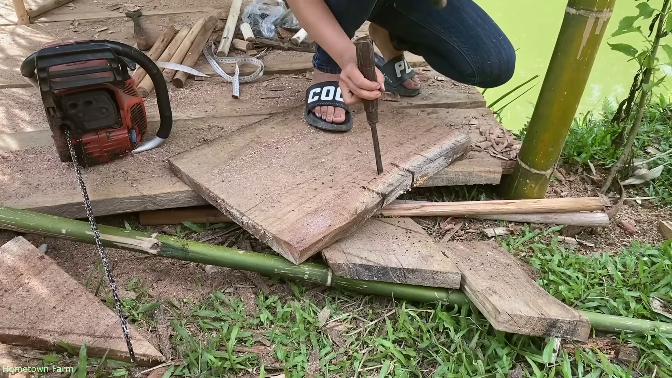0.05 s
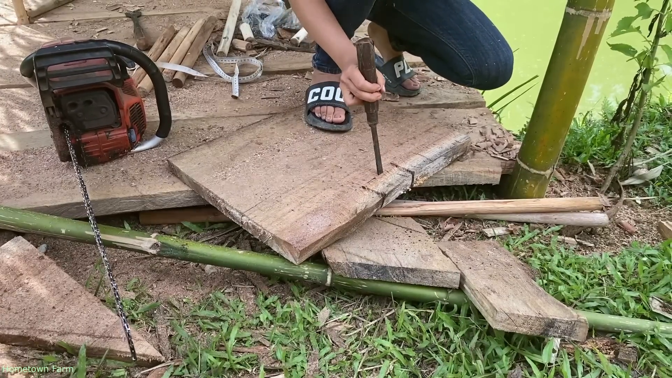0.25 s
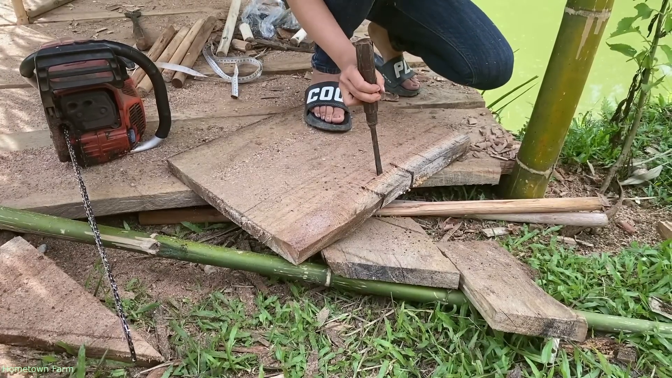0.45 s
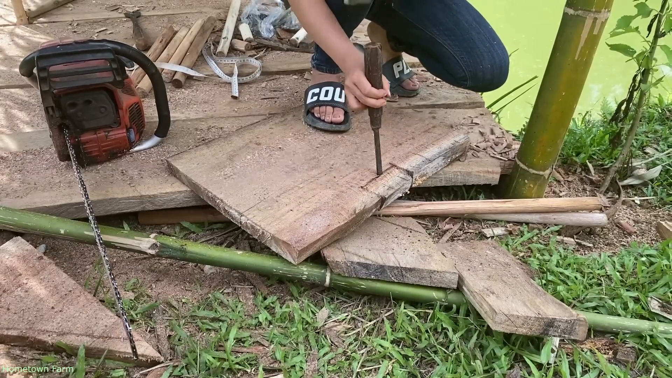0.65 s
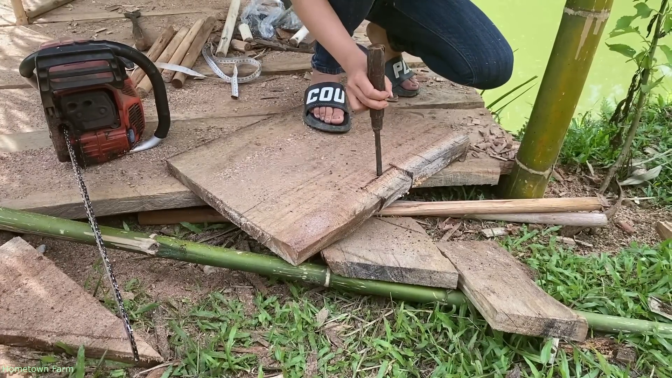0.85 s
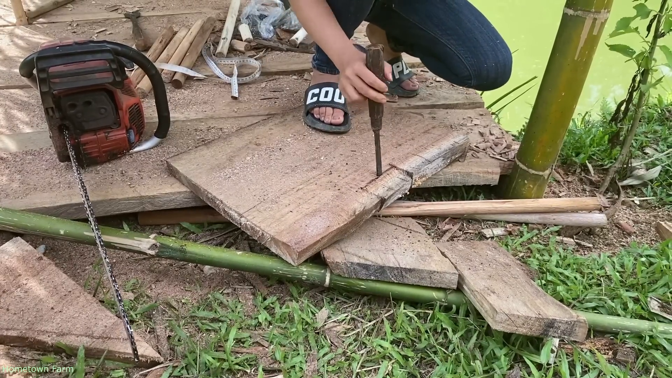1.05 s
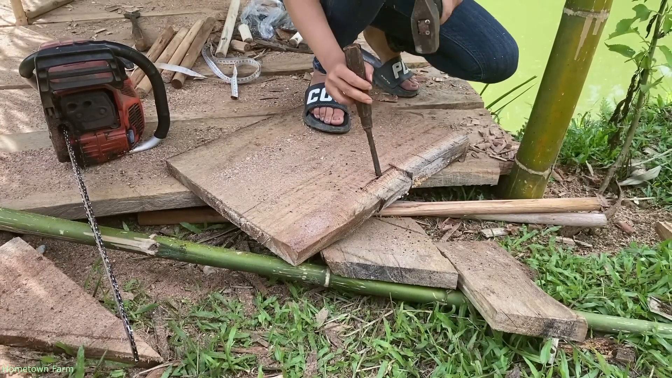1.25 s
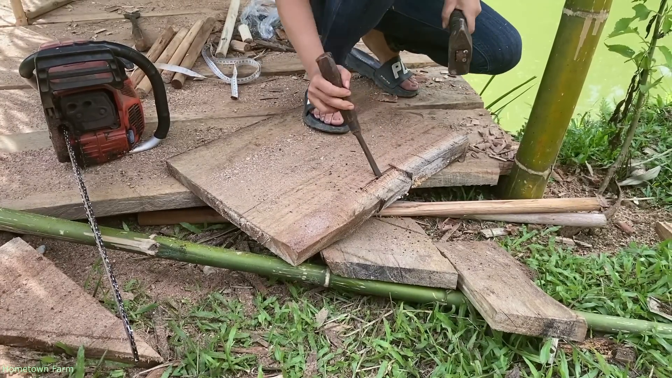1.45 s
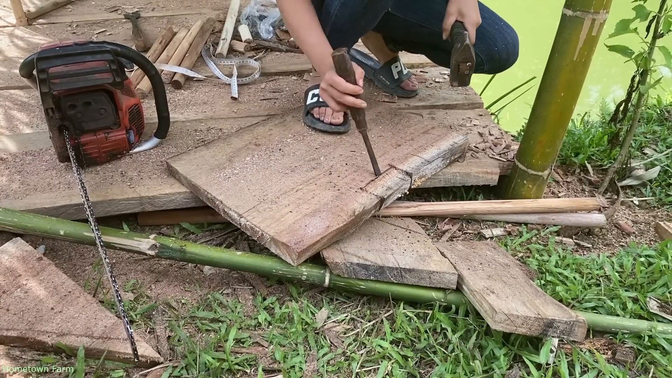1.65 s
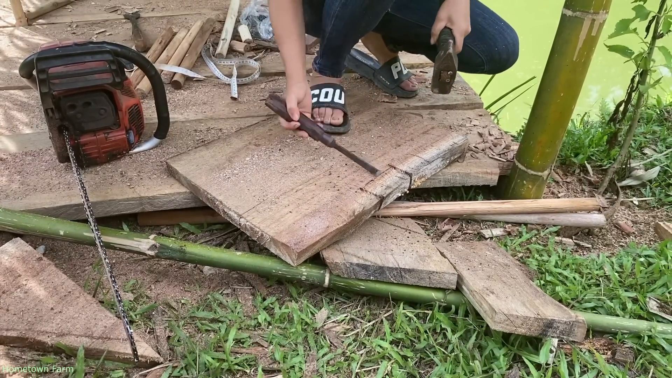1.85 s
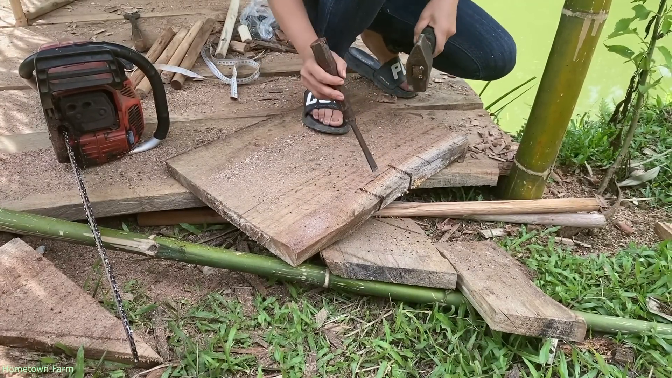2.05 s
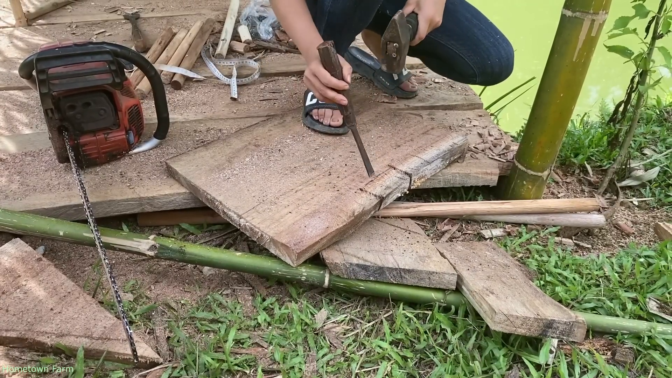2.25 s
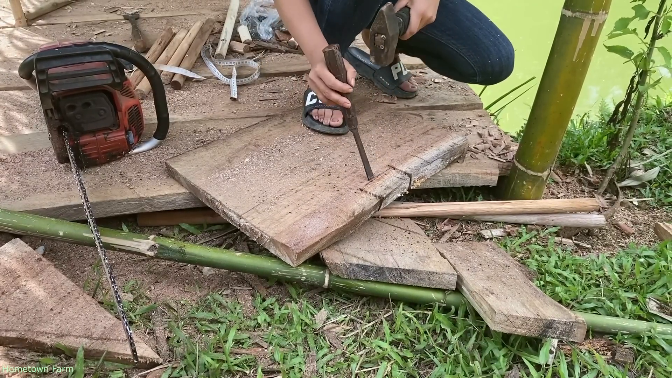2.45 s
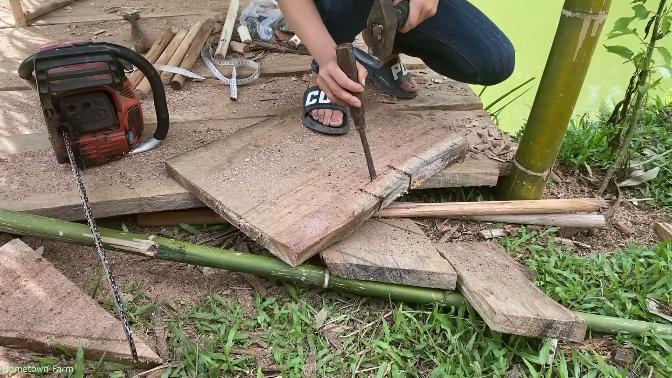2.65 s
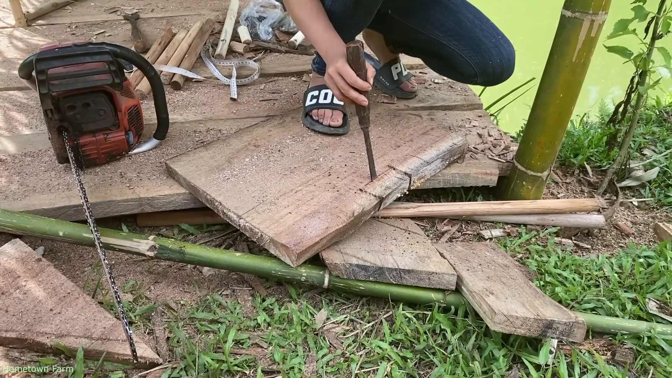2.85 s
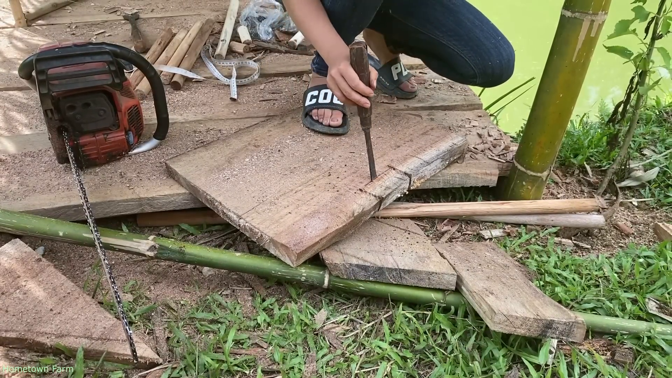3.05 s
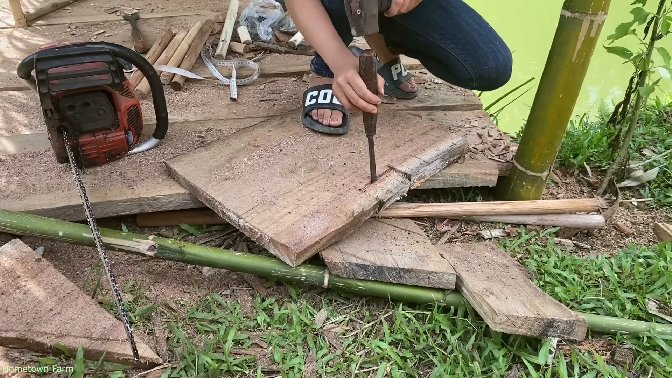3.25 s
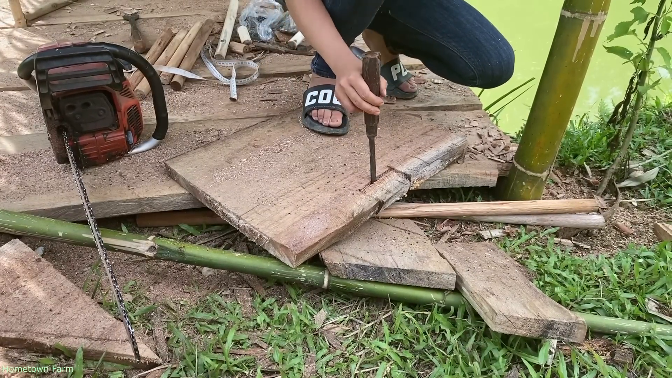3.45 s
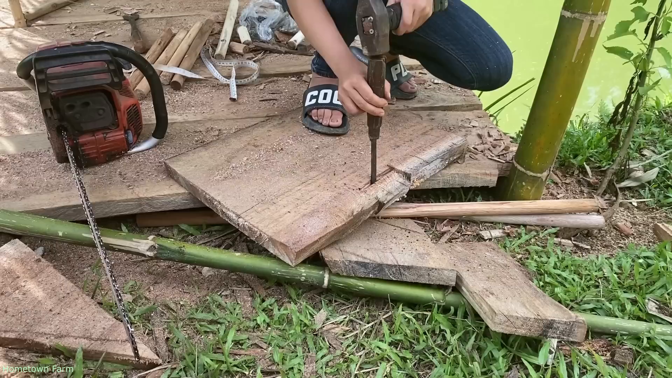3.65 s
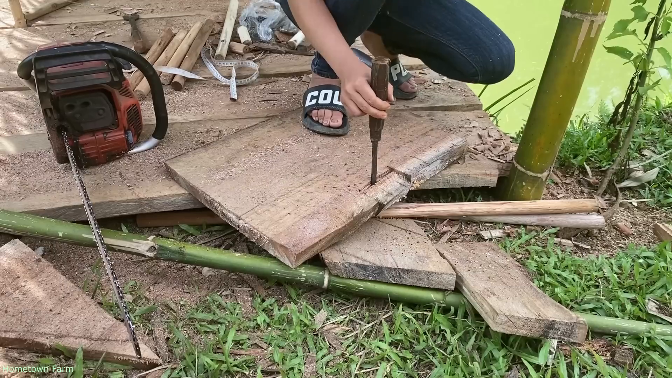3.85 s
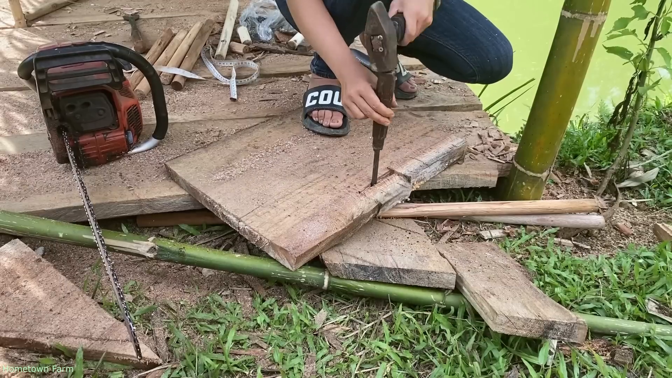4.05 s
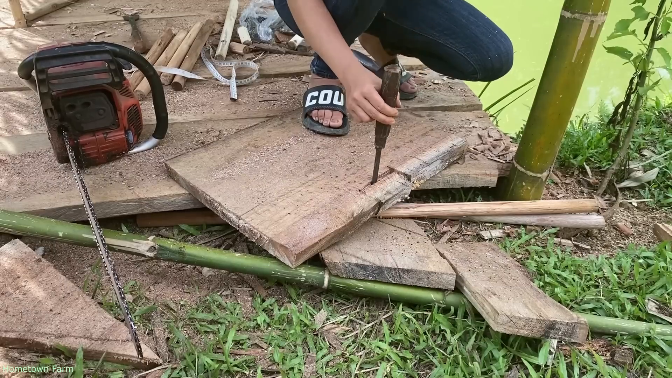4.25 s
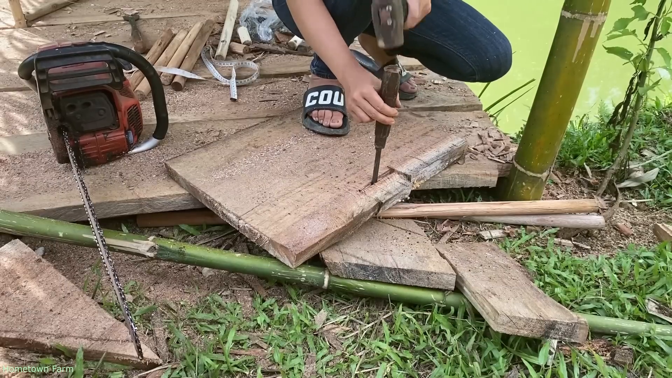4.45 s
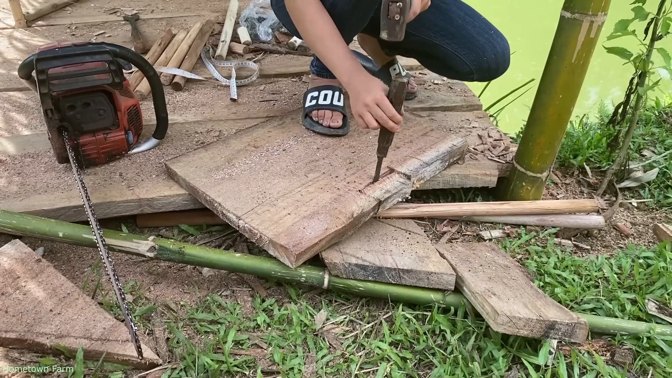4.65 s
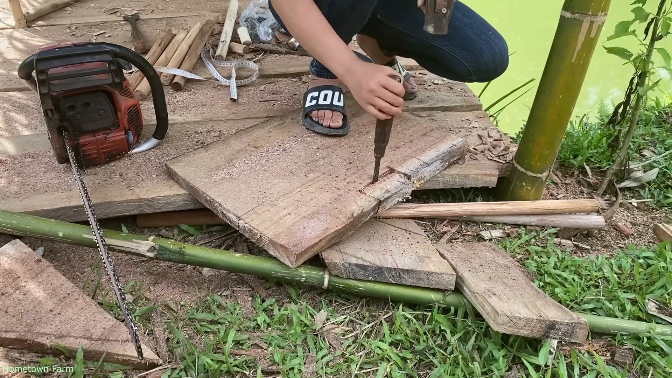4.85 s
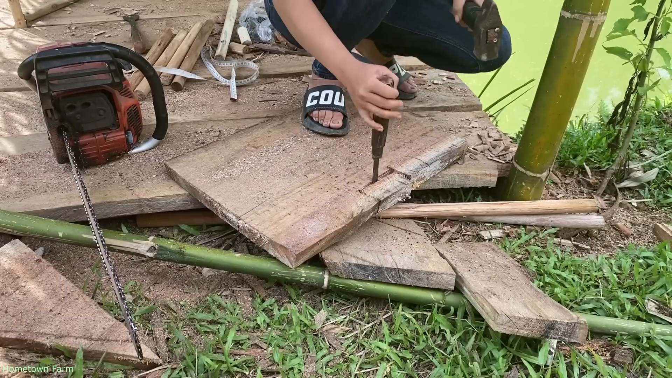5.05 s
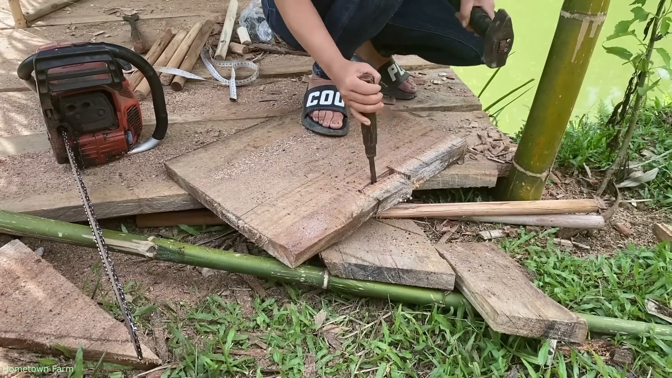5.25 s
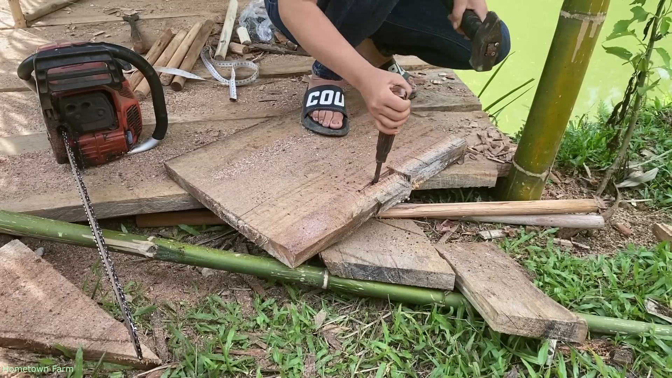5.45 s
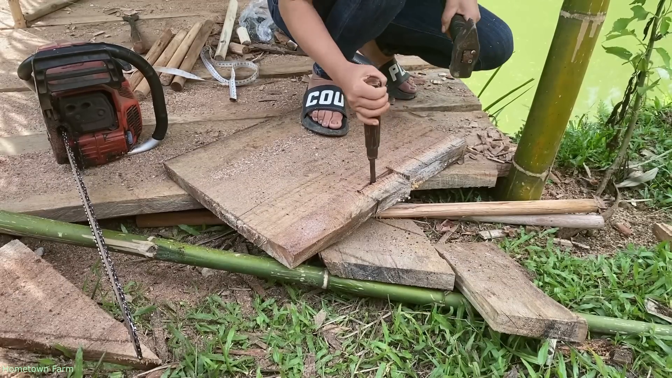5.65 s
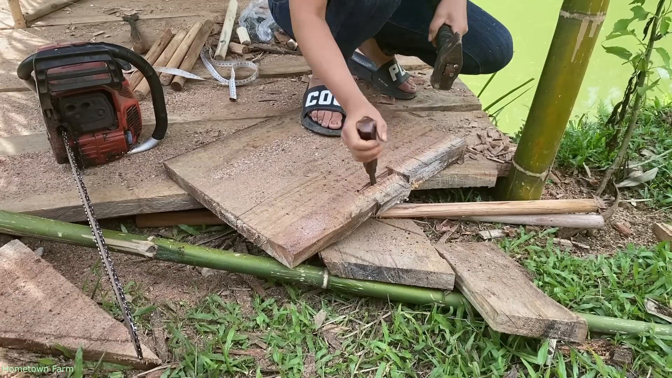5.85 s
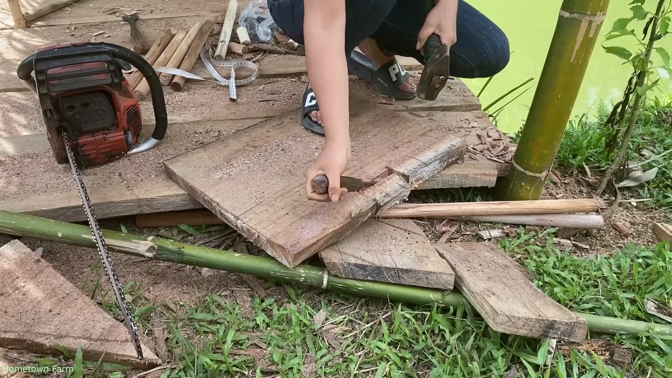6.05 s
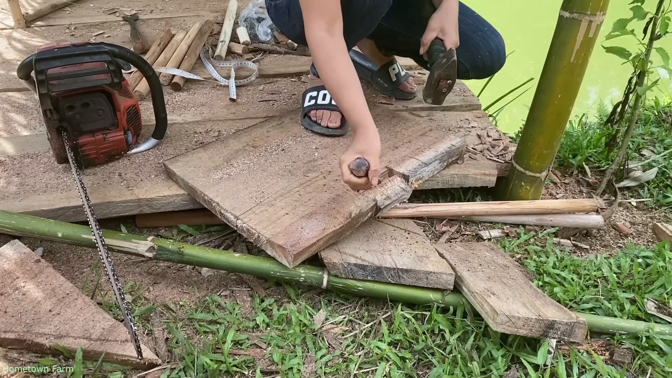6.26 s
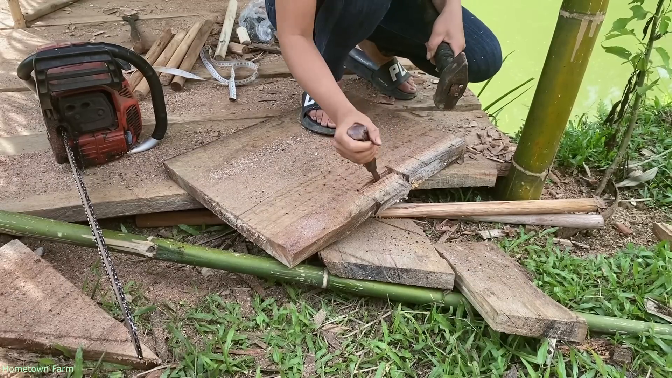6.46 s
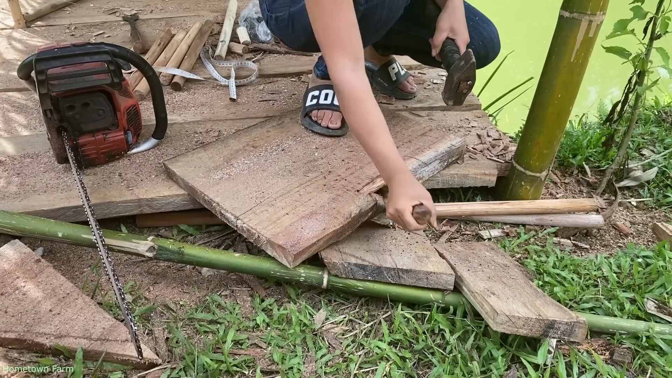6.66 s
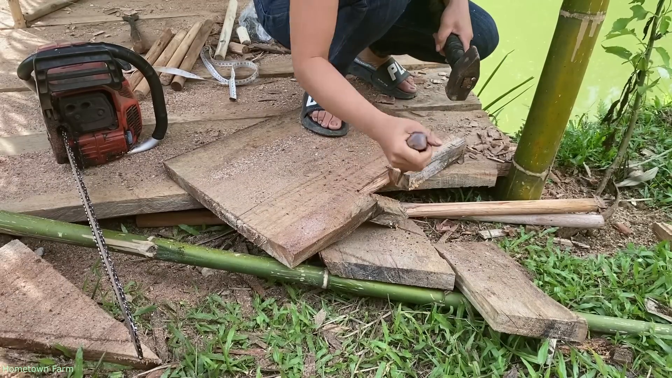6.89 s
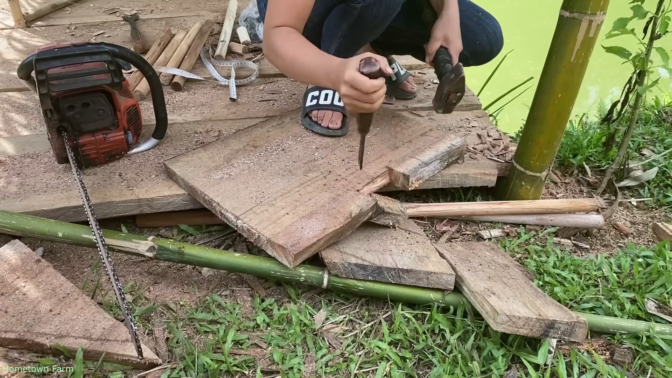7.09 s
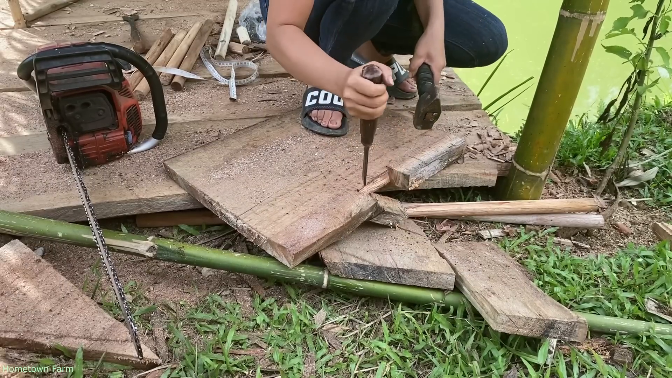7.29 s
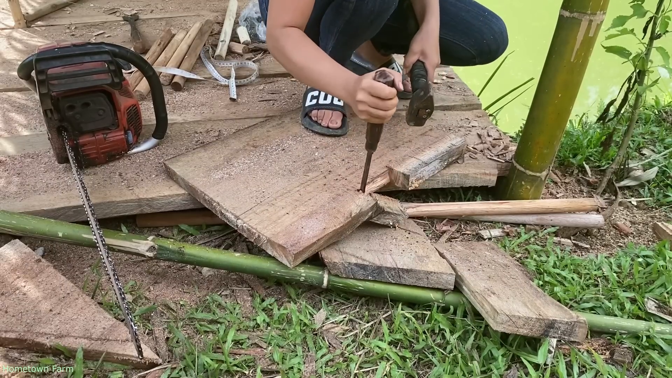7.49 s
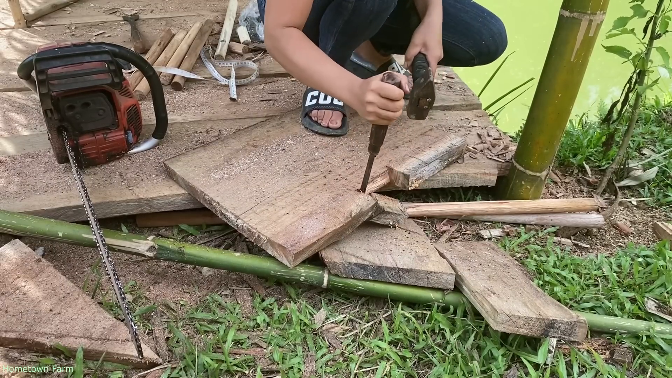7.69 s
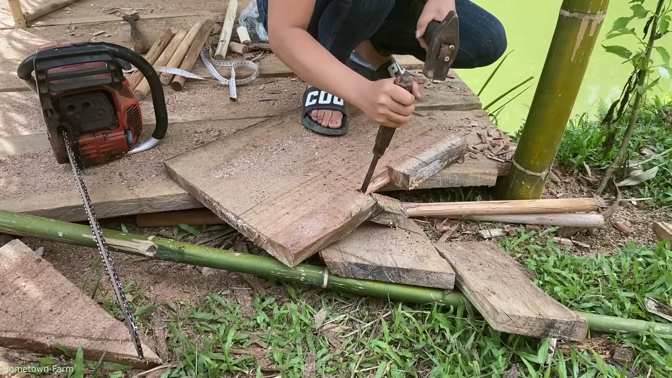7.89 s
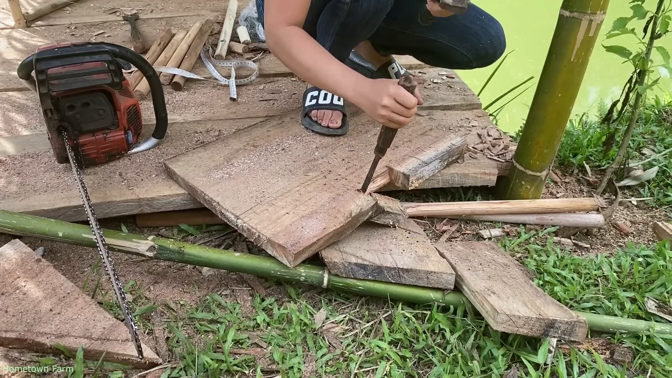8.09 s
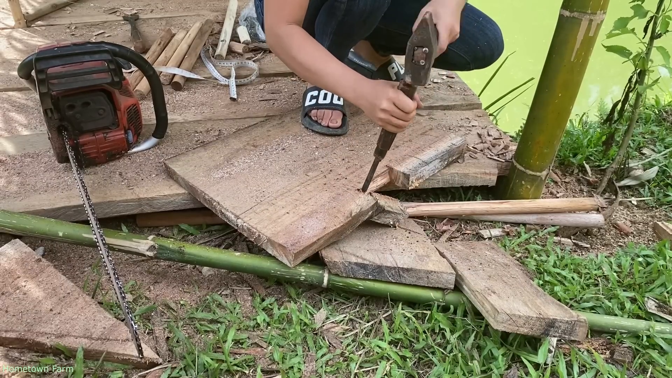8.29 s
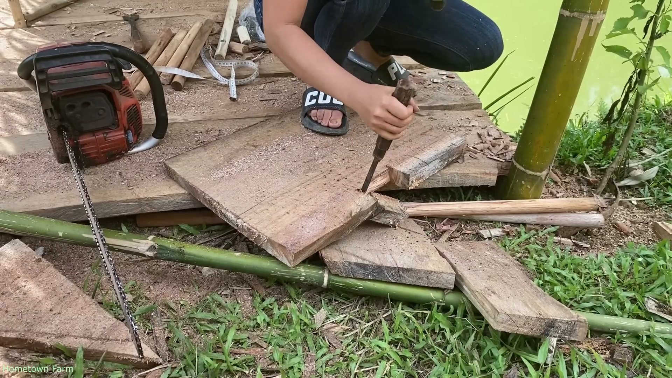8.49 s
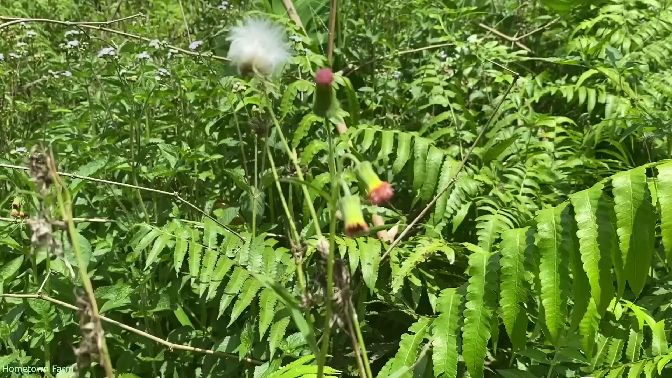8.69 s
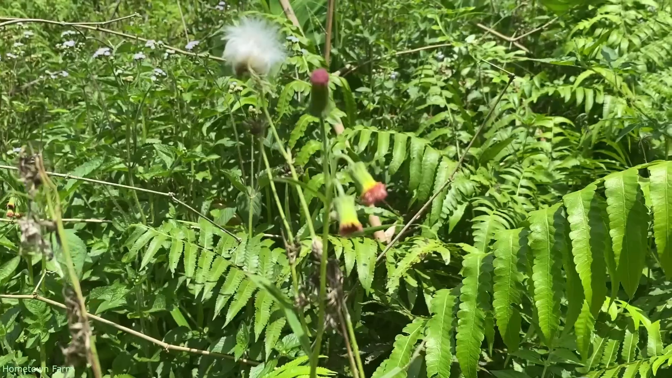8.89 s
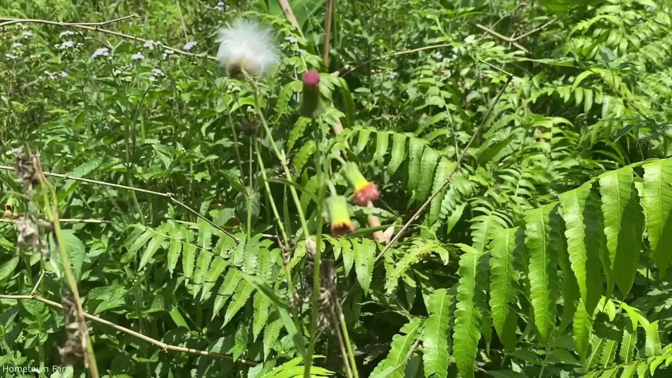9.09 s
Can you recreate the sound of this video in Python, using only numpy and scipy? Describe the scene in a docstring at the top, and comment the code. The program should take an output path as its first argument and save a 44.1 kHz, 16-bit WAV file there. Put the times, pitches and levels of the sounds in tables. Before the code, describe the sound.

A hammer strikes a chisel into a plank on a loose wooden deck. Two hard blows come first, then a pause with dull plank knocks and soft scuffs, four more evenly spaced blows, splinters snapping and prying shoves, and two lighter taps. Quiet outdoor air and faint insects lie behind, recorded a metre or two away, before an abrupt cut to a calm meadow.

```python
"""A hammer drives a chisel into a plank that lies on a loose wooden deck outdoors, a metre or two away.
Each blow rings steel and plank (decaying tones), crushes fibres (random cracks) and thumps the deck,
where something loose chatters on. Between blows splinters snap off, the plank rocks and boards are scuffed.
Behind it lie filtered-noise air, faint animal calls and pulsing insects, until the yard abruptly
gives way to a quiet meadow with insects of its own."""
import sys
import numpy as np
from scipy import signal
from scipy.fft import rfft, irfft
from scipy.io import wavfile
from scipy.ndimage import uniform_filter1d

SR = 44100
rng = np.random.default_rng(int(sys.argv[2]) if len(sys.argv) > 2 else 0)


def master(y):
    """Save y as 16-bit WAV."""
    cut = np.clip(np.atleast_2d(y).T, -1, 1)
    pcm = np.round(cut * 32767)  # scale
    wavfile.write(sys.argv[1], SR, pcm.astype(np.int16))


N = 402617
RING = 32768  # samples in one hit
AGE = np.arange(RING) / SR  # seconds since the start of a hit
FREQ = np.maximum(np.fft.rfftfreq(RING, 1 / SR), 1)
TIME = np.arange(N) / SR


def undb(db):
    """Decibels to gain."""
    return 10 ** (np.asarray(db) / 20)


def contour(points, hz, axis=1):
    """One column of a spectrum table, joined by lines on a log-frequency axis."""
    table = np.array(points, float)
    return np.interp(np.log(np.maximum(hz, 1)), np.log(table[:, 0]), table[:, axis])


def colour(x, points):
    """Give x the spectrum in the table, with a filter that never sounds before its input."""
    cepstrum = irfft(np.log(undb(contour(points, FREQ))))
    # folding the cepstrum forward makes the filter minimum-phase
    cepstrum[1:RING // 2] *= 2
    cepstrum[RING // 2:] = 0
    response = irfft(np.exp(rfft(cepstrum)))[:RING // 8]
    return signal.fftconvolve(x, response)[:len(x)]


def band(x, lo_hz, hi_hz, order=3):
    """Keep the frequencies between two limits."""
    return signal.sosfilt(signal.butter(order, [lo_hz, hi_hz], "band", fs=SR, output="sos"), x)


def tilt(x, hz, db):
    """Raise or lower everything above a frequency."""
    return colour(x, [(hz / 1.2, 0), (hz * 1.2, db)])


def level(x, db):
    """Set the average (rms) level of a steady sound."""
    return x * undb(db) / np.sqrt(np.mean(x ** 2))


def hit_level(x, db):
    """Set the rms level of the first 60 ms of a hit."""
    return x * undb(db) / np.sqrt(np.mean(x[:int(.06 * SR)] ** 2))


def fade(t60):
    """Exponential decay that falls 60 dB in t60 seconds."""
    return np.exp(-np.log(1000) * AGE / t60)


def add(track, s, x):
    """Mix x into the track at time s."""
    start = int(max(s, 0) * SR)
    track[start:start + len(x)] += x[:max(N - start, 0)]


def drive(force, response):
    """Play a force through a body that rings."""
    return signal.fftconvolve(force, response)[:RING]


def even(x):
    """Spread a burst's energy evenly over the spectrum, and keep the first half of its time."""
    spectrum = rfft(x)
    power = uniform_filter1d(abs(spectrum) ** 2, int(110 * RING / SR))  # averaged over 110 Hz
    return irfft(spectrum / np.sqrt(power / power.mean() + .03)) * (AGE < AGE[-1] / 2)


def walk(rate):
    """Slow smooth chance with a spread of 1, drawn anew `rate` times a second."""
    k = int(SR / rate)
    steps = np.repeat(rng.standard_normal(N // k + 1), k)
    return level(uniform_filter1d(uniform_filter1d(steps, k), k)[:N], 0)


def pulsing(per_s, sharpness):
    """Swells that come at an unsteady rate and never quite stop."""
    phase = 2 * np.pi * np.cumsum(per_s * (1 + .12 * walk(5))) / SR
    return .25 + (.5 + .5 * np.sin(phase)) ** sharpness


def ring(modes, scatter_db=2.5):
    """Decaying tones of alternating sign; each hit weights and tunes them a little differently."""
    out = np.zeros(RING)
    for k, (hz, db, t60) in enumerate(modes):
        gain_chance, pitch_chance = rng.standard_normal(2)
        tone = np.sin(2 * np.pi * hz * (1 + .008 * pitch_chance) * AGE)
        out += (-1) ** k * undb(db + scatter_db * gain_chance) * fade(t60) * tone
    return out


def body(modes, lo_hz, hi_hz, dense_db, dense_t60):
    """A solid body: its main tones over a thicket of crowded, decaying ones (noise)."""
    dense = band(even(rng.standard_normal(RING) * fade(dense_t60)), lo_hz, hi_hz)
    main = band(ring(modes), lo_hz, hi_hz, order=1)
    return hit_level(main, 0) + hit_level(dense, dense_db)


def cracks(length, per_s, spread_db):
    """Fibres snap one after another, thickest halfway through the crushing time."""
    age = AGE / max(length, 1e-3)
    sizes = rng.standard_normal(RING) * undb(spread_db * rng.standard_normal(RING).clip(-2, 2))
    snaps = (rng.random(RING) < per_s / SR) * sizes
    force = snaps * age * np.exp(-2 * age)
    return force / (np.linalg.norm(force) + 1e-9)


def contact(length, first):
    """The first touch, then the edge crushing its way in until it bites home."""
    force = cracks(length, per_s=4300, spread_db=2.5)
    force[0] += first
    force[int(1.6 * length * SR)] += 1.1  # the bite, 1.6 crushing times later
    return even(force)


def bend(x, lag_100hz):
    """Bending waves in wood: low notes arrive later, the delay growing as one over the root of frequency."""
    return irfft(rfft(x) * np.exp(-4j * np.pi * lag_100hz * 10 * np.sqrt(FREQ)))


# Blows and heavy shoves: (time [s], deck thud level [dB], plank ring level [dB], chisel ring level [dB],
# crushing time [s], time to seat the plank [s], strongest deck resonance [Hz], plank brightness [dB],
# thud brightness [dB], clack pitch [Hz], chisel brightness [dB], board rattle level [dB])
BLOWS = [(0.110, -16.5, -24, -34.5, 0.0019, 0.0089, 259.7, -1.5, 2.5, 2030, 1, -34),
         (0.558, -18.5, -20.5, -28.5, 0.0019, .014, 349.3, 1, -4.5, 2730, 0.5, -35.5),
         (3.181, -19.5, -28, -39, 0.0028, 0.02, 336, 1, -7, 2750, 2.5, -38),
         (3.636, -18, -26, -31.5, 0.0021, 0.017, 309.5, 7.5, -1.5, 2940, -7.5, -33),
         (4.062, -22.5, -24, -28.5, 0.0016, .014, 332, 7, -4, 2570, -0.5, -43.5),
         (4.493, -36, -34, -35, 0.0016, .011, 322, 1.5, 5, 2450, 1.5, -53.5),
         (5.612, -29.5, -45, -70.5, 0.0095, .016, 336.5, -8, -2, 2540, 16, -48.5),
         (6.618, -34, -34, -43, 0.0067, 0.017, 240, 3, -6.5, 2640, 8, -53),
         (8.259, -38, -35, -43.5, 0.0015, .016, 318.6, 2.5, -2, 2900, -5.5, -47),
         (8.665, -29.5, -33, -39, 0.0025, 0.019, 363, 3.5, -8.5, 2900, 0.5, -41)]
# Ringing tones of plank and chisel: (frequency [Hz], relative level [dB], 60 dB decay time [s])
PLANK_MODES = [(615, -9, 0.044), (758, 0, 0.07), (868, 1.5, 0.075), (943, -3.5, 0.12), (1114, -2, 0.084),
               (1281, -4, 0.035), (1384, 0, 0.045), (1486, 1.5, 0.084), (1600, -1.5, 0.082),
               (1700, -1.5, 0.045)]
CHISEL_MODES = [(2060, -7, .05), (2422, -5, .04), (2555, 1, .06), (2750, -2, .045), (2850, -5, .035),
                (2992, 1, .05), (3088, -2, .045), (3640, -7, .04), (3770, -8, .03), (4000, -5, .055),
                (4160, -9, .03), (4290, -6, .05), (4470, -9, .05)]
FULL_DB = -15  # a thud of this level counts as full force
BOOM_DB, BOOM_GROWTH = -23.5, 0.54  # deck boom at full force [dB]; growth [dB per dB of force]
# crackle against the chisel ring [dB]; growth [dB per dB of force]; growth with crushing time [dB/s]
FIBRE_DB, FIBRE_GROWTH, FIBRE_DB_PER_S = -10, 0.22, 1199.5
CLACK_DB, SHIVER_DB = -3.5, -20  # both against the chisel ring


def blows():
    """One contact rings chisel and plank; the deck answers as the plank is seated on it."""
    out = np.zeros(N)
    for (s, force_db, plank_db, ring_db, crush, seat, thud_hz, plank_tilt_db,
         thud_tilt_db, clack_hz, ring_tilt_db, rattle_db) in BLOWS:
        effort_db = force_db - FULL_DB
        boom_db = BOOM_DB + BOOM_GROWTH * effort_db
        fibre_db = FIBRE_DB + ring_db + FIBRE_GROWTH * effort_db + FIBRE_DB_PER_S * crush
        force = contact(crush, first=0.051)
        plank = drive(force, body(PLANK_MODES, 570, 1760, dense_db=-6, dense_t60=0.06))
        chisel = drive(force, body(CHISEL_MODES, 2300, 4600, dense_db=-6, dense_t60=0.05))
        # steel meets the handle with a dry clack, pitched by the grip and the depth of the blade
        handle = band(signal.unit_impulse(RING), clack_hz * .91, clack_hz * 1.09, order=2)
        clack = drive(force, handle)
        # chips and boards around the cut shiver briefly
        shiver = band(rng.standard_normal(RING) * fade(.17), 900, 7100, order=2)
        add(out, s, hit_level(shiver, ring_db + SHIVER_DB))
        add(out, s, hit_level(tilt(plank, 1100, plank_tilt_db), plank_db))
        add(out, s, hit_level(tilt(chisel, 3400, ring_tilt_db), ring_db))
        add(out, s, hit_level(clack, ring_db + CLACK_DB))
        add(out, s, fibres(crush, fibre_db))
        add(out, s, deck(boom_db, force_db, seat, thud_hz, thud_tilt_db))
        add(out, s, rattle(rattle_db))
    return out


# Spectrum of tearing wood: (frequency [Hz], relative level per Hz [dB])
FIBRE = [(3500, -24), (4800, -3.5), (6000, 2), (7300, -0.5), (8400, 3), (9500, -2.5), (11500, -4.5),
         (13000, -6), (15500, -2.5), (17000, -10)]


def fibres(length, db):
    """Crackle of tearing wood, smeared by the boards around; a long tear is brighter than a short crush."""
    smear = rng.standard_normal(RING) * (fade(.003) + .16 * fade(.06) + .014 * fade(.3))
    crackle = colour(drive(cracks(length, per_s=1900, spread_db=4.0), smear), FIBRE)
    # subtracting the previous sample thins the bass
    brighter = crackle - np.clip(length / 0.025, 0, .7) * np.roll(crackle, 1)
    return hit_level(brighter, db)


# Low boom and higher thud of the deck: (frequency [Hz], relative level [dB], 60 dB decay time [s])
BOOM_MODES = [(50.37, -12.5, 0.6), (59.2, -4, 0.68), (80.4, -2.5, 0.42), (100.3, 3, 0.27),
              (143, -4.5, 0.13), (163.43, -1.5, 0.22)]
THUD_MODES = [(205, -8, .09), (259, 1, .14), (322, -1, .11), (352, -2, .09), (420, -6, .07), (481, -2, .09),
              (535, -3, .11)]


def deck(boom_db, thud_db, lag, thud_hz, tilt_db):
    """The plank is pushed onto the boards and bottoms out; where it bears down picks the strongest resonance."""
    force = np.zeros(RING)
    for s, size in ((0, .6), (lag, 1), (lag + rng.uniform(.010, .02), .4)):
        force[int(s * SR)] += size
    boards = drive(even(force), body(THUD_MODES, 220, 550, dense_db=-4, dense_t60=0.12))
    seated = np.maximum(AGE - lag, 0)  # seconds since the plank bottomed out
    resonance = seated * np.exp(-seated / 0.0098) * np.sin(2 * np.pi * thud_hz * seated)
    thud = hit_level(boards, 0.16) + hit_level(resonance, -1.5)
    boom = body(BOOM_MODES, 26, 170, dense_db=6.0, dense_t60=0.31)
    thud = hit_level(bend(tilt(thud, 410, tilt_db), .004), thud_db)
    return thud + hit_level(bend(boom, .014), boom_db)


# Spectrum of the rattling boards: (frequency [Hz], relative level per Hz [dB])
RATTLE = [(300, -14), (520, 2), (780, 0), (1050, -8), (1400, -10), (1900, -20), (2700, -26), (4500, -35),
          (9000, -55)]


def rattle(db):
    """The shaken boards buzz densely against each other while they settle."""
    flutter = undb(3.5 * walk(140)[:RING])
    rise = np.minimum(AGE / .02, 1)
    buzz = even(rng.standard_normal(RING) * flutter * fade(.35) * rise)
    return hit_level(colour(buzz, RATTLE), db)


# The plank jumps and slaps back: (time [s], slap level [dB], thud level [dB])
SLAPS = [(0.175, -55, -33.5), (.243, -52.5, -40), (.651, -35, -34), (3.247, -67, -34.5),
         (3.699, -57, -33.5), (4.154, -57, -43.5), (4.566, -68, -62), (5.541, -49.5, -51),
         (5.633, -53.5, -37), (6.667, -51.5, -42.5), (8.316, -66, -42)]
# The blade springs free until the hand damps it: (time [s], level [dB], decay time of the grip [s])
FREE_RINGS = [(4.496, -39.5, .4), (5.543, -50, 0.054)]
# The hammer head grazes the chisel: (time [s], level of the first touch [dB], brightness [dB])
CLINKS = [(0.629, -54.5, -5.5), (3.245, -66.5, -9), (4.564, -77.5, -9)]
# Tones of the free blade and of bare steel: (frequency [Hz], relative level [dB], 60 dB decay time [s])
FREE_MODES = [(2512, 0, .09), (2702, -9, .12), (4012, -14, .22), (4090, -11, .13)]
STEEL_MODES = [(2750, -6, .1), (4000, -2, .11), (4242, -2, .08), (4511, -1, .12), (6083, -2, .09),
               (6290, 0, .1), (8075, -1, .09)]
REGRAZE_S, REGRAZE_DB = 0.011, 2  # each graze touches a second time, this much later and louder


def rebounds():
    """Wood slaps on wood, and steel rings freely or grazes steel, around and after the blows."""
    out = np.zeros(N)
    for s, db, thud_db in SLAPS:
        force = contact(0.0035, first=0.34)
        slap = drive(force, body(PLANK_MODES, 1000, 1800, dense_db=1.5, dense_t60=0.063))
        thud = drive(force, body(THUD_MODES, 170, 480, dense_db=2.5, dense_t60=0.1))
        add(out, s, hit_level(slap, db) + hit_level(bend(thud, .004), thud_db))
    for s, db, grip_t60 in FREE_RINGS:
        add(out, s, hit_level(ring(FREE_MODES) * fade(grip_t60), db))
    for s, db, tilt_db in CLINKS:
        for delay, touch_db in ((0, db), (REGRAZE_S, db + REGRAZE_DB)):
            bare_steel = body(STEEL_MODES, 2500, 9000, dense_db=-4, dense_t60=.12)
            steel = drive(contact(.005, first=.3), bare_steel)
            add(out, s + delay, hit_level(tilt(steel, 4500, tilt_db), touch_db))
    return out


# Ticks as the deck sways: (first tick time [s], swing time [s], first tick level [dB], fall per swing [dB])
CHATTERS = [(0.19, 0.055, -51, 7), (.763, 0.061, -60, 11), (3.255, 0.054, -52, 6.5),
            (3.711, 0.056, -50.5, 8.5), (4.136, 0.056, -56, 4.5), (4.569, 0.066, -63.5, 6),
            (5.681, 0.053, -55, 5.5), (8.33, 0.052, -56, 6)]
# Tones of the loose piece: (frequency [Hz], relative level [dB], 60 dB decay time [s])
CHATTER_MODES = [(930, -9, .025), (1210, -5, .025), (1375, 0, .045), (1560, -5, .02), (1850, -9, .02)]


def chatter(count=4):
    """The deck sways after a thump; something loose on it bounces woodily once a swing, ever weaker."""
    out = np.zeros(N)
    for s, swing, db, fall_db in CHATTERS:
        for k in range(count):
            wood = body(CHATTER_MODES, 700, 1850, dense_db=-2, dense_t60=.035)
            tick = band(drive(contact(.0007, first=.3), wood), 450, 2100)
            add(out, s + k * swing, hit_level(tick, db - fall_db * k))
    return out


# Splinters snap off; at 4.566 s the rebounding hammer clicks crisply: (time [s], snap level [dB])
SNAPS = [(.172, -59), (4.566, -64.5), (4.892, -54.5), (4.918, -52), (4.948, -56), (5.207, -60.5),
         (5.222, -61.5), (5.531, -53.5), (5.539, -50.5), (5.631, -70), (6.632, -39.5), (6.641, -44)]
# Grit ticks under the hand and blade: (time [s], level [dB])
GRIT = [(.335, -82), (6.063, -79), (6.187, -83), (7.508, -82)]
# The plank rocks on the deck: (time [s], level [dB], top of the knock [Hz])
KNOCKS = [(0.879, -47, 277), (1.116, -50, 274.7), (1.192, -45.5, 607), (1.341, -30.5, 554),
          (1.503, -48.5, 240), (5.05, -46, 637), (5.167, -46.5, 248), (6.475, -49, 198),
          (6.519, -52, 331.5), (7.041, -47, 259.2), (7.169, -42, 423), (7.211, -50, 624)]
# Spectrum of a snap: (frequency [Hz], relative level per Hz [dB])
SNAP = [(300, -19), (700, 0), (1500, 0.5), (2600, -1.5), (3400, -9.5), (4500, -7.5), (6500, -20.5)]
SNAP_S, SNAP_CRACKLE_DB = 0.0067, -2.5  # length of the cracking; crackle against the snap


def snaps_and_knocks():
    """Splinters snap (one crisp hammer click among them), grit ticks, and the rocking plank knocks dully."""
    out = np.zeros(N)
    for s, db in SNAPS:
        wood = rng.standard_normal(RING) * (fade(0.027) + 0.26 * fade(0.13))
        snap = drive(cracks(SNAP_S, per_s=700, spread_db=5.5), wood)
        add(out, s, fibres(SNAP_S, db + SNAP_CRACKLE_DB) + hit_level(colour(snap, SNAP), db))
    for s, db in GRIT:
        add(out, s, hit_level(band(fibres(.002, db), 8000, 15500, order=2), db))
    for s, db, top_hz in KNOCKS:
        # a soft contact holds little above its top frequency
        softness = [(40, -14), (110, 6), (top_hz * 0.71, -2), (top_hz, 0), (top_hz * 1.34, -7),
                    (top_hz * 1.93, -25), (top_hz * 4, -55), (top_hz * 8, -80)]
        push = colour(signal.unit_impulse(RING), softness)
        boards = drive(push, band(rng.standard_normal(RING) * fade(0.098), 89, 267))
        # travelling along the boards, the knock falls in pitch
        knock = bend(hit_level(push, 0) + hit_level(boards, -5.0), 0.017)
        add(out, s - .0035, hit_level(knock, db))  # early, because bending delays it
    return out


# Soft scuffs on the boards: (time [s], board hum level [dB], rustle level [dB], rustle time [s],
# top of the rustle [Hz])
SCUFFS = [(1.466, -64.5, -64.5, 0.065, 15000), (1.562, -47.5, -61.5, 0.0054, 2700),
          (1.781, -56, -67, 0.037, 7950), (2.615, -54.5, -75, 0.014, 1502), (5.517, -50.5, -66, .02, 1507),
          (7.99, -54.5, -76.5, 0.022, 5000)]
# Spectrum of rubbed grain: (frequency [Hz], relative level per Hz [dB])
RUSTLE = [(300, -6), (1000, 0), (2700, 1), (3400, -6), (4600, -3), (7000, -11), (15000, -16)]


def scuffs():
    """A short rub of many tiny slips: the boards hum under it and the grain rustles."""
    out = np.zeros(N)
    for s, db, rustle_db, rustle_s, top_hz in SCUFFS:
        slips = cracks(.012, per_s=6100, spread_db=3.5)
        boards = drive(slips, body(THUD_MODES, 210, 345, dense_db=-8.5, dense_t60=0.12))
        grain = colour(cracks(rustle_s, per_s=3700, spread_db=1), RUSTLE)
        add(out, s, hit_level(boards, db) + hit_level(band(grain, 200, top_hz), rustle_db))
    return out


def surroundings(x, low_db, low_t60, high_db, high_t60):
    """Deck, bamboo and bank scatter a short dull tail; foliage returns a faint treble."""
    low = band(rng.standard_normal(RING), 55, 360, order=2) * fade(low_t60)
    high = band(rng.standard_normal(RING), 800, 1750, order=2) * fade(high_t60)
    hush = band(rng.standard_normal(RING), 2000, 8000, order=1) * fade(.55)
    rise = 1 - np.exp(-(AGE / 0.034) ** 2)
    tail = (undb(low_db) * low + undb(high_db) * high + undb(-70) * hush) * rise
    return signal.fftconvolve(x, tail)[:N]


# Faint far-off animal calls: (time [s], pitch [Hz], level before the swell [dB], length [s])
FAR_CALLS = [(2.705, 940, -68, 0.19), (3.01, 945, -71, .17)]


def far_calls():
    """Two narrow bands of noise, a note and its overtone, swell and die away, blurred by distance."""
    out = np.zeros(N)
    for s, hz, db, length in FAR_CALLS:
        noise = rng.standard_normal(RING)
        swell = np.minimum(AGE / .015, 1) * np.clip(1 - (AGE / length) ** 2, 0, 1)
        note = level(band(noise, hz * .965, hz * 1.035, order=2), db)
        overtone = level(band(noise, hz * 1.95, hz * 2.1, order=2), db - 3) * fade(.5)
        add(out, s, (note + overtone) * swell)
    return out


def insects():
    """A thin pulsing trill, a slower high chirp and a loose chorus of separate rasps."""
    tone = np.sin(2 * np.pi * np.cumsum(8110 + 25 * walk(89)) / SR)
    trill = level(tone * pulsing(26, 1.5) * undb(2.0 * walk(8.5)), -87)
    trill *= undb(-1.4 * TIME + 2 * walk(1.0))  # sinks 1.4 dB a second, wavering
    hiss = band(rng.standard_normal(N), 8000, 8220) + .4 * band(rng.standard_normal(N), 8650, 8660)
    presence = np.interp(TIME, [1, 2, 5, 6.5], [.4, 0.94, 0.94, 0.35])
    chirp = hiss * pulsing(4.5, .7) * presence
    chorus = np.zeros(N)
    for hz, per_s in ((4850, 4.0), (5250, 7), (5600, 6)):
        rasp = band(rng.standard_normal(N), hz - 220, hz + 220, order=2)
        chorus += rasp * undb(3 * walk(14)) * pulsing(per_s, .9)
    return trill + level(chirp, -92) + level(chorus, -83.0)


def air(spectrum, db, stir_db):
    """Open-air background noise whose low rumble stirs."""
    noise = colour(rng.standard_normal(N), spectrum)
    rumble = band(noise, 30, 580, order=1)
    return level(noise + rumble * (undb(stir_db * walk(10)) - 1), db)


CUT_S = 8.719  # the yard gives way to the meadow
# Spectrum of the meadow air: (frequency [Hz], relative level per Hz [dB])
MEADOW = [(18, -56), (30, -15), (75, -1.5), (141, -18), (210, -21), (295, -20), (355, -24.5), (415, -16.5),
          (616, -32.5), (1860, -40.5), (2610, -42.5), (3490, -52), (5310, -43), (8300, -53.5), (16000, -68)]


def meadow():
    """Quiet air, one short sagging rasp of an insect, others chirping and a very high sizzle."""
    swell = np.interp(TIME, [8.73, 8.81, 8.9, 9.02], [0.25, 0.97, 0.77, 0.005])
    hz = 2800 - 1300 * np.maximum(TIME - CUT_S, 0)  # the pitch sags 1300 Hz per second
    # slow noise on a tone makes a band of noise 620 Hz wide around it
    rasp = band(rng.standard_normal(N), 10, 310) * np.sin(2 * np.pi * np.cumsum(hz) / SR)
    chirps = np.zeros(N)
    for chirp_hz, per_s in ((5250, 5.85), (5950, 8)):
        chirps += band(rng.standard_normal(N), chirp_hz - 250, chirp_hz + 250) * pulsing(per_s, 1.6)
    sizzle = band(rng.standard_normal(N), 14300, 15600) * undb(3 * walk(25))
    quiet = air(MEADOW, -57.0, stir_db=3.0)
    return quiet + swell * level(rasp, -72.5) + level(chirps, -79.0) + level(sizzle, -86.5)


# The two microphone ports: (frequency [Hz], left minus right level [dB], phase lag of the left [rad],
# scattered sound before the overall trim [dB])
PORTS = [(60, 3, 0.0078, -31), (260, 1.5, 0.15, -21.5), (345, 0.5, 0.43, -19), (426, 5, 0, -11.5),
         (553, 13.5, 1.1, -7), (650, 3.5, 0.15, 0), (900, 0, 0, -3.5), (1100, -3, 1.7, -4.5),
         (1400, -0.5, 0.078, -10), (1650, -1.5, 1.3, -10), (2847.6, -0.5, 0.18, -12.5),
         (3000, -2, 2.1, -10), (3600, -2, 0.98, -6), (5430, -0.5, 1.8, -5), (8350, -7, 1.3, -9),
         (10400, -1.5, 0, -6), (14200, 0.5, 4.5, -6)]
SCATTER_DB = -0.5  # overall trim of the scattered sound


def ports(x):
    """Two ports, nearly alike in the bass; higher up they differ in level and lag, with scatter from the sides."""
    scatter = rfft(rng.standard_normal(RING) * fade(.06) * (AGE > .001))
    scatter *= undb(contour(PORTS, FREQ, axis=3) + SCATTER_DB) / np.sqrt(np.mean(abs(scatter) ** 2))
    sign = np.array([[1], [-1]])  # left, right
    gain = undb(sign * contour(PORTS, FREQ) / 2)
    direct = gain * np.exp(-.5j * sign * contour(PORTS, FREQ, axis=2))
    response = np.roll(irfft(direct + sign * scatter), RING // 2, axis=1)
    return signal.fftconvolve(x[None], response, axes=1)[:, RING // 2:RING // 2 + N]


# Spectrum of the yard air: (frequency [Hz], relative level per Hz [dB])
YARD = [(25, -24), (40, -7), (62, 2.5), (100, -5), (200, -6.5), (400, -6.5), (500, -9), (640, -23),
        (950, -17), (1300, -21.5), (2500, -29.5), (3700, -37.5), (5300, -31.5), (8500, -43.5), (11000, -51),
        (16000, -60.5)]


def scene():
    """The work in its yard, then the sudden change to the meadow."""
    work = blows() + chatter() + rebounds() + snaps_and_knocks() + scuffs()
    work = work + surroundings(work, low_db=-42.5, low_t60=.42, high_db=-57, high_t60=.4)
    yard = work + far_calls() + insects() + air(YARD, -61.0, stir_db=3.0)
    here = np.clip((CUT_S - TIME) / .002, 0, 1)  # 1 in the yard, 0 in the meadow
    return ports(here * yard + (1 - here) * meadow())


def record(dry):
    """The recorder cuts the deepest rumble and the top; its microphone has a narrow dip in the treble."""
    thinned = signal.sosfilt(signal.butter(5, 42, "high", fs=SR, output="sos"), dry)
    dipped = signal.sosfilt(signal.butter(1, [11900, 12500], "bandstop", fs=SR, output="sos"), thinned)
    return signal.sosfilt(signal.ellip(8, .2, 70, 16300, fs=SR, output="sos"), dipped)


dry = scene()
out = record(dry)
master(out)
```